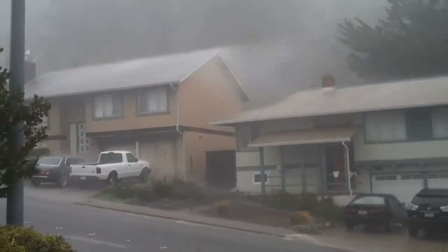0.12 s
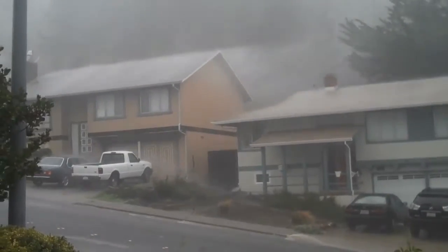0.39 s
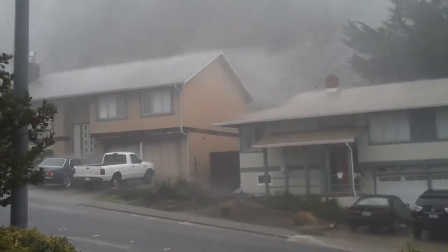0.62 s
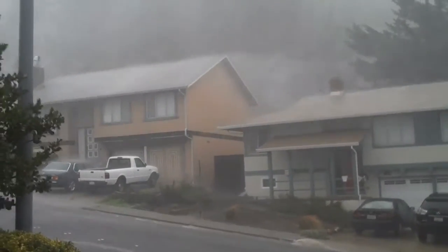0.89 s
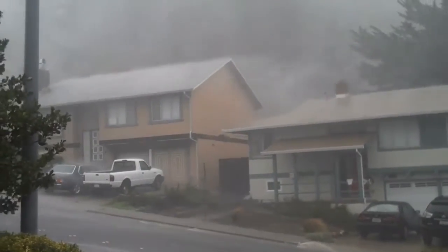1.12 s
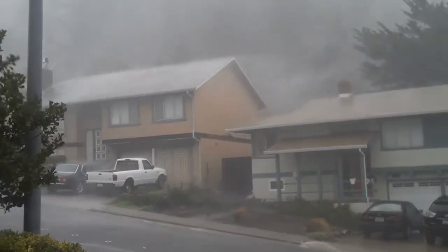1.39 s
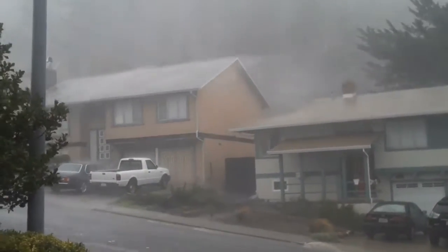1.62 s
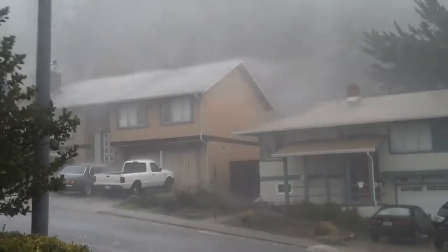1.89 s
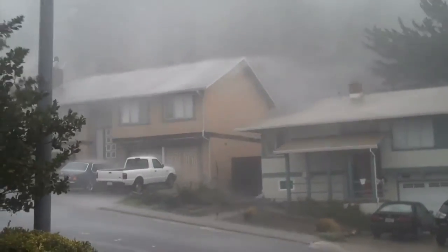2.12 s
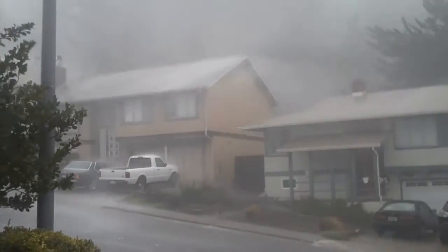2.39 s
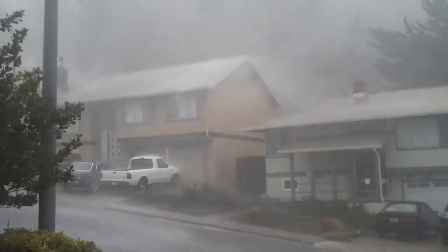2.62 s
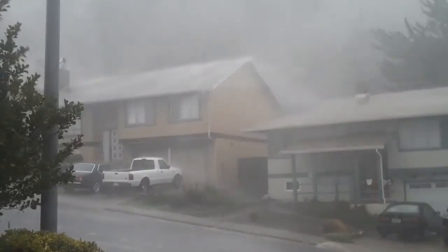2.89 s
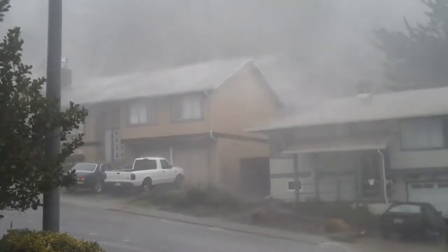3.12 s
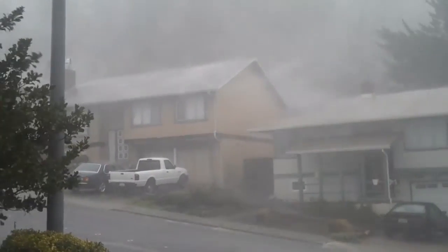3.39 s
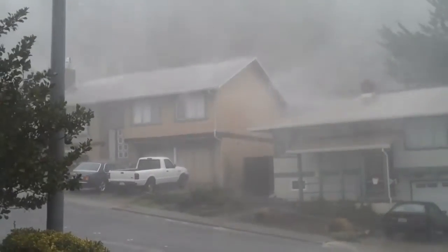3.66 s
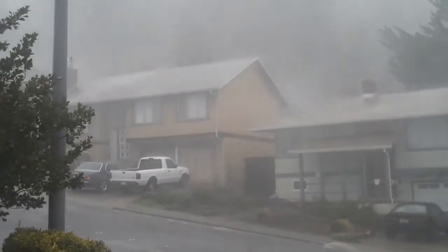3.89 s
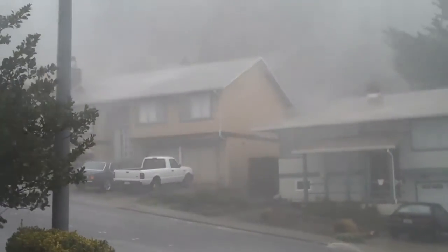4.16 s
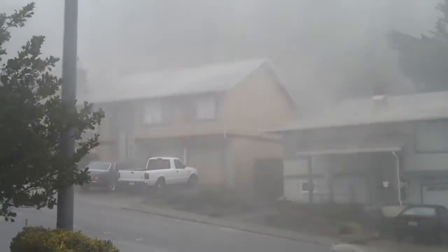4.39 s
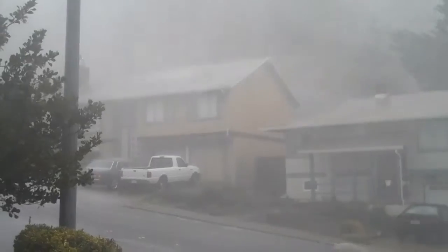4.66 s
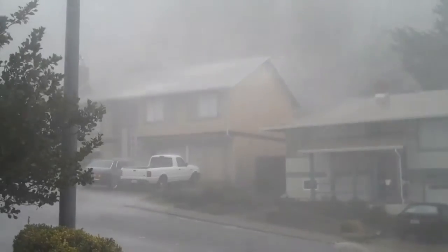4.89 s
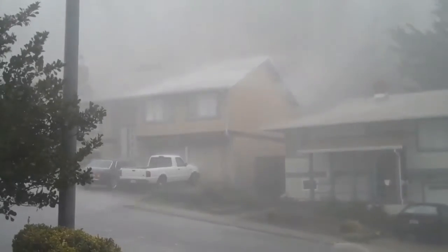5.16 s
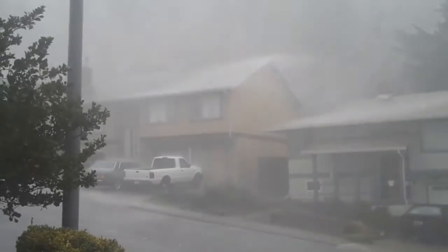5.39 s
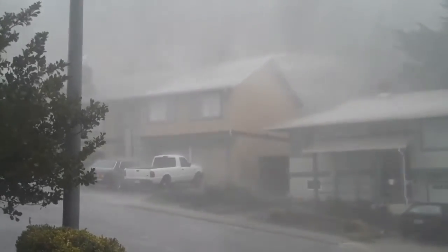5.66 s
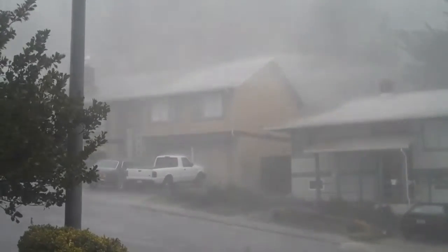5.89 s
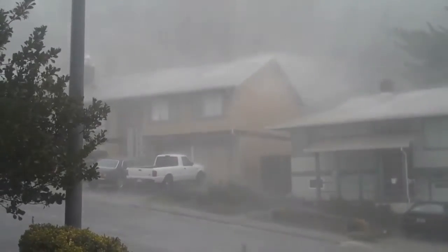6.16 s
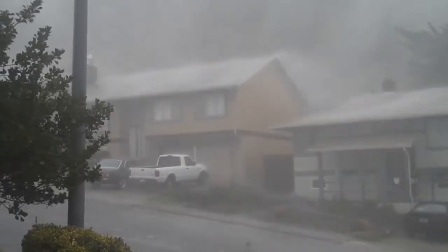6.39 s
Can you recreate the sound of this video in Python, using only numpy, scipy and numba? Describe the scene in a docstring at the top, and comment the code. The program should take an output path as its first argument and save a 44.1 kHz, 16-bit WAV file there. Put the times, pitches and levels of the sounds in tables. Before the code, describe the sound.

A gusty downpour rushes outdoors among houses and trees, bright and grainy, broken by soft wind puffs and a single hard mid-clip buffet.

```python
"""Heavy rain in gusty wind on a street of houses and trees: a broad roar under a bright, grainy hiss.
Gusts buffet the camera microphone with uneven puffs; several overlap to make one sharp thump.
Roar, hiss, mist and sheets of rain are coloured noise or random impacts with flickering bands.
Strong puffs are hard-edged sine bursts, and one light tap on the camera is a smooth push."""
import sys
import numpy as np
from scipy import signal
from scipy.fft import rfft, irfft, next_fast_len
from scipy.io import wavfile
from scipy.ndimage import uniform_filter1d
from numba import njit

SR = 44100
rng = np.random.default_rng(int(sys.argv[2]) if len(sys.argv) > 2 else 0)


def generate_wav(sig):
    """Save sig (samples, or channels by samples) to the path in sys.argv[1] as 16-bit PCM at SR."""
    pcm = np.round(np.clip(np.atleast_2d(sig).T, -1, 1) * 32767).astype(np.int16)
    wavfile.write(sys.argv[1], SR, pcm)


def gain_from_db(level_db):
    """Convert decibel levels to linear amplitude factors (20 dB per decade)."""
    decades = np.asarray(level_db, float) / 20
    return 10 ** decades


N = 287973  # length [samples]
T = np.arange(N) / SR  # time [s]
SIZE = next_fast_len(N)  # transform length [samples]

# Course of the storm: (time [s], roar of wind and rain in the trees [dB], hiss of spray and drops [dB])
STORM_LEVELS = [(0.0, -35, -38.5), (0.53, -34.5, -38.5), (0.9, -34.5, -38.5), (0.98, -33, -37.5),
                (1.5, -33.5, -36), (1.89, -33, -34.5), (2.3, -33.5, -35), (2.7, -33, -35),
                (3.2, -34.5, -35), (3.35, -34.5, -35), (3.65, -33, -33.5), (4.1, -34.5, -34),
                (4.6, -36, -33.5), (4.87, -37.5, -35), (5.0, -36, -33.5), (5.4, -37.5, -34.5),
                (5.9, -37, -35), (6.2, -37, -36), (6.53, -37, -37)]


def curve(table, column):
    """One column of a table, drawn as straight lines along time."""
    rows = np.array(table)
    return np.interp(T, rows[:, 0], rows[:, column])


def walk(rate):
    """Random levels held 1 / rate s and slewed twice; spread 1."""
    hold = int(SR / rate)
    steps = np.repeat(rng.standard_normal(N // hold + 1), hold)
    slewed = uniform_filter1d(uniform_filter1d(steps, hold), hold)[:N]
    return slewed / slewed.std()


def bands(x, colour, lo_hz, hi_hz, shared_db, own_db):
    """Colour x to rms 1 between lo and hi, then let half-octave bands flicker together and alone."""
    octave = np.log2(np.maximum(np.fft.rfftfreq(SIZE, 1 / SR), 1))
    points = np.array(colour)
    point_octaves = np.log2(points[:, 0])
    tone = rfft(x, SIZE) * gain_from_db(np.interp(octave, point_octaves, points[:, 1], left=-90, right=-90))

    inside = (octave > np.log2(lo_hz)) & (octave < np.log2(hi_hz))
    tone = tone * np.sqrt(SIZE * N / 2 / np.sum(np.abs(tone[inside]) ** 2))

    out, shared = 0, walk(14)
    for centre in np.arange(np.floor(point_octaves[0]), point_octaves[-1] + 0.5, 0.5):
        share = np.clip(1 - 2 * np.abs(octave - centre), 0, 1)  # neighbouring bands crossfade
        flicker = gain_from_db(shared_db * shared + own_db * walk(12))
        out = out + flicker * irfft(tone * share, SIZE)[:N]
    return out


def drops(per_s, scatter_db):
    """Impacts at random moments, many small and a few large."""
    chance = rng.random((N, 2))
    size = gain_from_db(-scatter_db * np.log(1 - chance[:, 1]))
    return (chance[:, 0] < per_s / SR) * size * rng.standard_normal(N)


def roar():
    """Thousands of far leaves and drops merge into a smooth rush."""
    # Colour of the rush: (frequency [Hz], level per Hz [dB])
    roar_colour = [(25, -29), (70, -43), (140, -36), (220, -11.5), (330, -11.5), (420, -4.5), (700, -2.5),
                   (1200, -1), (2500, -2.5), (4000, -7), (8000, -12.5), (14000, -29.5)]
    rush = bands(rng.standard_normal(N), roar_colour, 520, 2760, shared_db=0.32, own_db=0.5)
    return gain_from_db(curve(STORM_LEVELS, 1)) * rush


def hiss():
    """Spray far off is smooth; nearer drops add a fine grain."""
    # Colour of spray and drops: (frequency [Hz], level per Hz [dB])
    hiss_colour = [(800, -11.5), (2500, -4), (5000, -1.5), (8300, 0), (10000, -3.5), (12000, -10.5),
                   (14000, -14)]
    rain = rng.standard_normal(N) + gain_from_db(-1.5) * drops(per_s=4000, scatter_db=1.74)
    return gain_from_db(curve(STORM_LEVELS, 2)) * bands(rain, hiss_colour, 5600, 14600, shared_db=0.4, own_db=0.2)


def sheets():
    """Wind-thrown sheets of drops patter on the road nearby in small quick surges."""
    # Strength of the sheets: (time [s], level [dB])
    sheet_levels = [(0, -47), (.8, -44.5), (1.5, -43.5), (2.1, -37), (2.7, -41.5), (3.2, -43), (3.8, -36),
                    (4.4, -40), (5.2, -43), (5.8, -48), (6.53, -54)]
    # Colour of the patter: (frequency [Hz], level per Hz [dB])
    sheet_colour = [(1300, -12), (2200, -3.5), (3200, -0.5), (4500, -4), (6500, -16)]
    impacts = drops(per_s=5000, scatter_db=1.5)
    patter = bands(impacts, sheet_colour, 1300, 6500, shared_db=1.5, own_db=1.0)
    return gain_from_db(curve(sheet_levels, 1)) * patter


def buffet():
    """Small eddies shed over the port: uneven low pressure pulses that swell and die with each gust."""
    # Gusts at the port: (time of peak [s], level [dB], rise over 20 dB [s], fall over 20 dB [s])
    gust_list = [(.08, -61, .2, 0.26), (0.6, -48, 0.55, 0.4), (1.38, -58, 0.089, .3),
                 (2.07, -57, 0.35, 0.39), (2.52, -56, 0.14, 0.3), (2.85, -65, .15, .15),
                 (3.265, -37, 0.088, 0.055), (3.4, -54, .15, 0.28), (3.62, -57, .35, 0.18),
                 (5.8, -65.5, 0.26, .3), (6.13, -61, 0.18, .2)]
    # Colour of the eddies: (frequency [Hz], level per Hz [dB])
    buffet_colour = [(25, -23), (60, -13), (150, -3), (300, -3), (500, -2.5), (1000, -17)]
    breeze_db = -30  # steady buffeting between gusts, relative to the roar

    eddies = drops(per_s=800, scatter_db=1.0)
    air = gain_from_db(curve(STORM_LEVELS, 1) + breeze_db)
    for peak_s, db, rise, fall in gust_list:
        distance = np.maximum((peak_s - T) / rise, (T - peak_s) / fall)
        air = np.hypot(air, gain_from_db(db - 20 * distance))
    return air * bands(eddies, buffet_colour, 40, 340, shared_db=-0.5, own_db=2.5)


def puffs():
    """Short hard-edged bursts of wind noise under bell envelopes; several overlap to make the thump."""
    # Bursts, level ahead of squaring and the port's leak:
    # (time of onset [s], level [dB], pitch [Hz], half the burst's length [cycles])
    puff_list = [(.366, -47, 95, 1.5), (.44, -42, 300, 1.5), (.478, -46, 150, 1.2), (0.513, -38, 175, 1.7),
                 (.524, -35, 290, 2.2), (.548, -46, 150, 1.5), (0.574, -39, 165, 1.9),
                 (.597, -35, 305, 2.2), (0.612, -39, 110, 1.5), (.636, -41, 200, 1), (0.673, -34, 280, 2.3),
                 (.684, -43, 150, 1.2), (.705, -38, 380, 2), (.752, -39, 350, 2), (.772, -43, 150, 1.2),
                 (.868, -49, 90, 1.2), (2.503, -48, 130, 1.5), (3.193, -44, 120, 1.1),
                 (3.213, -40, 160, 1.7), (3.235, -26, 1200, 2.2), (3.238, -33, 200, 0.82),
                 (3.246, -26, 195, 1.4), (3.249, -24, 440, 1.7), (3.265, -22, 440, 2.3),
                 (3.268, -28, 660, 2.2), (3.269, -28, 1200, 2.3), (3.263, -27, 195, 1.5),
                 (3.283, -29, 427, 2.6), (3.289, -23, 1010, 2.3), (3.29, -24, 580, 1.4),
                 (3.293, -23.5, 380, 0.7), (3.306, -42, 150, 1.8), (3.366, -39, 220, 1.4),
                 (3.384, -39, 240, 1.3), (3.396, -33, 270, 1.8), (3.398, -36, 450, 2.2),
                 (3.436, -44, 190, 1.5), (3.448, -45, 90, 1.2), (3.514, -40, 250, 1.2),
                 (3.553, -37, 220, 1.2), (3.57, -42, 170, 1.1), (3.586, -46, 110, 1.3),
                 (3.608, -31.5, 390, 1.8), (3.612, -46, 110, 1.2), (3.634, -46, 100, 1.2),
                 (3.672, -48, 80, 1.2)]
    edge = 1.5  # how square the swings are
    port_hz = 80  # the port leaks pressure swings slower than this

    out = np.zeros(N)
    phases = rng.random(len(puff_list))  # start of each swing [turns]
    for (onset_s, db, hz, cycles), phase in zip(puff_list, phases):
        span = cycles / hz
        t = np.arange(int(2 * span * SR)) / SR
        bell = np.exp(-(2 * t / span - 1.2) ** 2)
        swing = np.tanh(edge * np.sin(2 * np.pi * (hz * t + phase)))
        i = int(onset_s * SR)
        out[i:i + len(t)] += gain_from_db(db) * bell * swing
    leak = signal.butter(2, port_hz, "highpass", fs=SR, output="sos")
    return signal.sosfilt(leak, out)


def taps():
    """A soft contact with the camera body is one push, with no ring."""
    # Light taps: (time of peak [s], peak level [dB], contact [ms])
    tap_list = [(1.0522, -31, 1.1)]
    return sum(gain_from_db(db) * np.exp(-((T - s) * 2000 / ms) ** 2) for s, db, ms in tap_list)


def mist():
    """Finest spray, the very top of the hiss, thickens as the squall closes in."""
    # Density of the spray: (time [s], level [dB])
    mist_levels = [(0, -64), (1, -60), (2, -54), (3.5, -56), (4.6, -50), (5, -49), (5.7, -48), (6.53, -48)]
    # Colour of the spray: (frequency [Hz], level per Hz [dB])
    mist_colour = [(8000, -18), (11000, 1), (14000, -7)]
    spray = bands(rng.standard_normal(N), mist_colour, 10000, 14000, shared_db=0.4, own_db=0.8)
    return gain_from_db(curve(mist_levels, 1)) * spray


def scene():
    """All sources reach the single capsule, which feeds both channels."""
    rain = roar() + hiss() + sheets() + mist()
    microphone = buffet() + puffs() + taps()
    return np.tile(rain + microphone, (2, 1))


@njit
def follow(x, attack, release):
    """Envelope that rises fast and falls slowly."""
    env, e = np.empty(len(x)), 0.
    for i in range(len(x)):
        e += (abs(x[i]) - e) * (attack if abs(x[i]) > e else release)
        env[i] = e
    return env


def gain_control(x, top_db, ratio, attack_ms, release_ms):
    """The camera turns everything down while the envelope is above its threshold."""
    env = follow(x, 1000 / (attack_ms * SR), 1000 / (release_ms * SR))
    return x * np.minimum(gain_from_db(top_db) / (env + 1e-9), 1) ** (1 - 1 / ratio)


def treble_patches(x, db, per_s, patch_s, lo_hz, hi_hz, width_hz):
    """Brief random patches of narrow treble noise are added, opposite in left and right."""
    side, size = np.zeros(N), int(patch_s * SR)
    for turn, at, height in rng.random((60, 3)):
        if turn < per_s * N / SR / 60:  # 60 candidates, thinned to per_s on average
            i = int(at * (N - size))
            hz = lo_hz + height * (hi_hz - lo_hz - width_hz)
            sos = signal.butter(4, [hz, hz + width_hz], "bandpass", fs=SR, output="sos")
            patch = signal.sosfilt(sos, x[i:i + size][::-1])  # sound reversed in time
            side[i:i + size] += gain_from_db(db) * np.hanning(size) * patch
    return np.array([x + side, x - side])


def top_cut(x):
    """Nothing passes above the cut-off."""
    return signal.sosfilt(signal.butter(12, 14030, fs=SR, output="sos"), x)


def record(dry):
    """Gain control, brief treble patches and the converter's constant offset make the finished mix."""
    held = gain_control(dry[0], top_db=-21, ratio=2.5, attack_ms=3.0, release_ms=60.0)
    patched = treble_patches(held, db=-2.5, per_s=3.0, patch_s=0.045, lo_hz=4100, hi_hz=12500, width_hz=1250)
    mix = patched - 0.0004  # converter offset, full scale = 1
    return top_cut(mix)


dry = scene()
out = record(dry)
generate_wav(out)
```